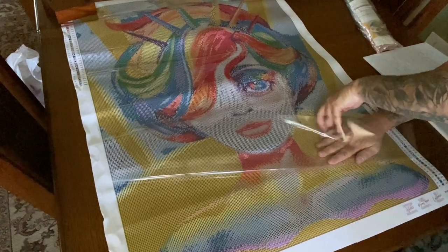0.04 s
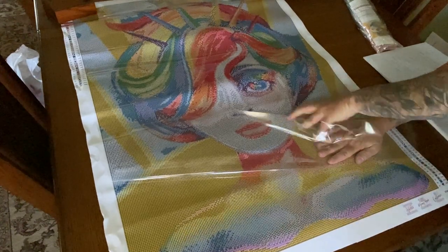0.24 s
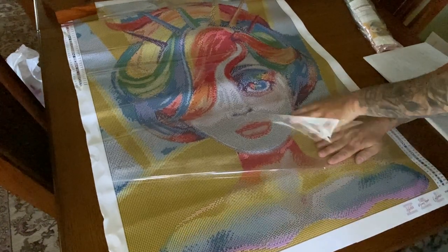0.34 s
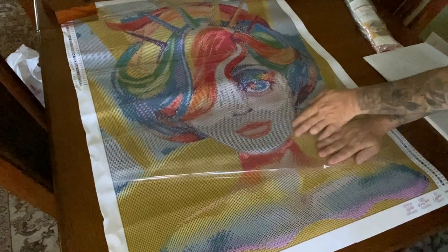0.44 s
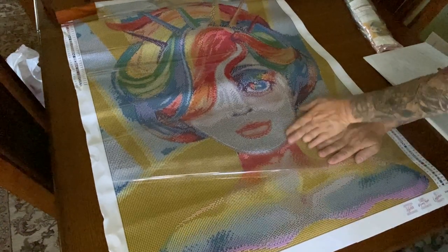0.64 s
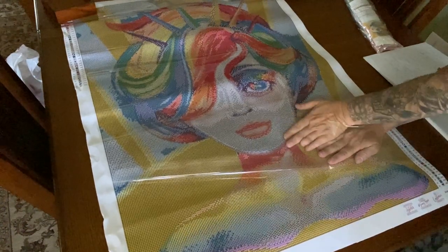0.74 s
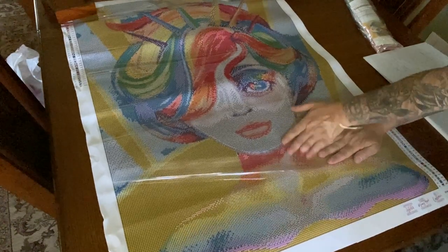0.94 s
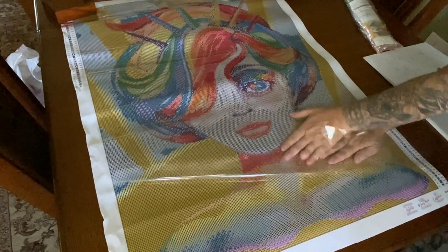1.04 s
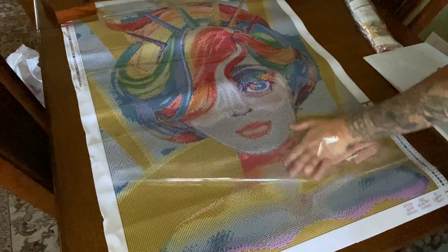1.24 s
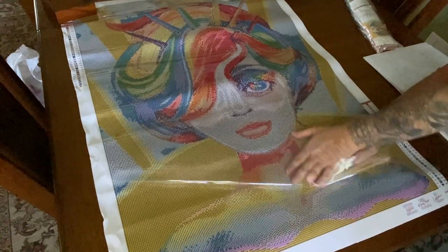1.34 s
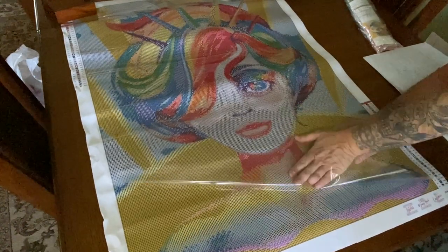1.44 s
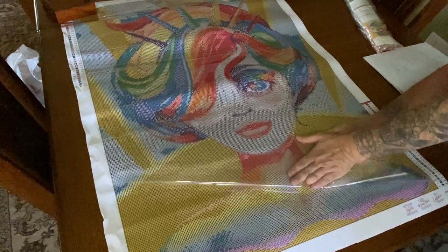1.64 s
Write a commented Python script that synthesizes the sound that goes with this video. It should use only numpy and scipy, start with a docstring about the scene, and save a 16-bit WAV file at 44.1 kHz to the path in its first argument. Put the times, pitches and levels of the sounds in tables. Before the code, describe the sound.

A thick plastic sheet crinkles with sharp, irregular snaps as hands lay it down and smooth it on a table. The crackle swells twice, with dull palm rubbing underneath, heard close by in a small room.

```python
"""In a small room, hands lay a thick plastic sheet on a table and smooth it flat, close by.
Creases buckle with sharp snaps that shiver through the sheet. Tiny wrinkles crackle under the hands,
and the sliding plastic hisses. The palms rub and bump the table, and leaning arms make it rumble.
The snaps and the crackle echo briefly in the room, over a faint hush."""
import sys
import numpy as np
from scipy import signal
from scipy.fft import rfft, irfft, next_fast_len
from scipy.io import wavfile
from scipy.ndimage import uniform_filter1d

SR = 44100
rng = np.random.default_rng(int(sys.argv[2]) if len(sys.argv) > 2 else 0)


def int16_out(signal):
    """Quantize to a 16-bit WAV file."""
    q = np.round(np.clip(np.atleast_2d(signal).T, -1, 1) * 32767)
    wavfile.write(sys.argv[1], SR, q.astype(np.int16))


N = 74970

# Each crease snap; a facet is the patch of plastic that buckles. All levels are relative.
# start_s, decay_steps (of DECAY_STEP_S), pitch_hz, body_db, treble_db, top_db, thud_db
CREASE_SNAPS = [(0.0763, 1.1, 1540, -16.5, -13, -5, -12.5), (0.0943, 1.8, 1100, -26, -20.5, -14, -19.5),
                (0.1549, 1.6, 1040, -19, -12.5, -9, -11.5), (0.2208, 0.6, 1480, -21, -29, -33, -42),
                (0.239, 2, 1410, -11.5, -10, -26, -16), (0.2445, 1.9, 1080, -11, -0.5, -7, -8.5),
                (0.247, 1.6, 1210, -3.5, 3.5, -9, -1.5), (0.2888, 0.97, 1290, -13, -10, -24, -12),
                (0.3097, 0.67, 1350, 7.5, 12.5, -2, -2.5), (0.3922, 0.29, 1550, 2.5, 5, 2.5, -2),
                (0.4934, 0.68, 1600, -7.5, -7, -22, -36), (0.5163, 1, 1070, -20, -10, -30, -48),
                (0.5865, 0.25, 1364, 5, 4.5, -6.5, -14), (0.6840, 0.4, 1520, -11.5, -2, -15, -23),
                (0.7227, 0.8, 1520, 4.5, 4, 2.5, -7.5), (0.9313, 0.4, 1280, -1.5, 0.5, -7.5, -42),
                (0.9968, 7, 1380, -7.5, -16.5, -32, -15), (1.0247, 0.3, 1350, 2.5, 6, 2, -13),
                (1.0252, 1.8, 1240, 5.5, -4.5, -3, -31), (1.0418, 3.6, 1000, -4, 4, -19, -8.5),
                (1.0862, 4.7, 1160, -6, -19, -38, -11), (1.1971, 0.78, 934, 8.5, 10.5, 7, -3.5),
                (1.2168, 3.7, 930, -0.5, 2, -18, -11.5), (1.2695, 0.19, 1110, -3, -4.5, -10, -1.5),
                (1.281, 0.58, 1310, 0.5, 2, 0.5, -15), (1.2862, 0.14, 1340, -2, 3, -22, -9),
                (1.3152, 1.2, 1260, -4.5, 4.5, -13, 2), (1.321, 1.7, 1370, 3, 11.5, 0, -1),
                (1.3383, 0.5, 1420, -3, -5, -0.5, -12), (1.3854, 0.19, 940, -1, 0, -7.5, 1.5),
                (1.5211, 3.7, 1320, -7.5, -15, -27, -7.5), (1.5722, 0.57, 1050, -3.5, -14.5, -25.5, -32),
                (1.6823, 1.05, 1260, -13.5, -30.5, -75, -17)]
# Where a snap's body, treble and top lie: pitch_hz
SNAP_BANDS = [2200, 5500, 12000]
# Peaks (+) and hollows (-) in the tone of the widest facets: start_s, pitch_hz, level_db
FACET_RESONANCES = [(0.3095, 1700, 1.5), (0.3095, 2200, -2), (0.3095, 3280, 4.5), (0.3095, 4750, -6.5),
                    (0.3918, 2600, 6), (0.5865, 2770, -6.5), (0.5865, 4240, -6.5), (0.7223, 1640, 3),
                    (0.7223, 2080, 5), (0.9309, 4720, -14), (1.1969, 780, 4.5), (1.1969, 1100, -3.5),
                    (1.1969, 1420, 5.5), (1.1969, 4650, -9.5), (1.3213, 2680, 8)]
# Tone of the sheet, its shiver, and the table's thud under a snap: pitch_hz, level_db
SHEET_TONE = [(1000, -1), (1450, 3.5), (2050, 4), (2700, 0), (3500, 2), (4800, -1), (6500, 0.5), (8200, 6),
              (10000, 4), (12500, 1), (14500, -4), (15700, -16), (17000, -30)]
SHIVER_TONE = [(300, 4.5), (1500, -3), (4000, -2), (8000, -4), (14000, -74)]
THUD_TONE = [(30, -62), (150, -14.5), (300, -8.5), (500, -5), (750, -5.5), (1100, -2), (2000, -57),
             (6000, -78)]
# How long the sheet and the room take to fade by 60 dB: pitch_hz, fade_s
SHIVER_FADE = [(300, 0.15), (1500, 0.064), (4000, 0.066), (12000, 0.0037)]
ROOM_FADE = [(200, 0.2), (700, 0.16), (2000, 0.4), (6000, 0.35), (13000, 0.12)]
# Tone given to the echo and crackle, with a treble dip applied near 9.7 kHz: pitch_hz, level_db
ECHO_TONE = [(150, 6), (500, 1), (1000, -3), (2000, -7), (4000, -7), (8300, -9.5), (9700, -18),
             (12500, -2.5), (15500, -58)]
CRACKLE_TONE = [(100, -33), (600, -9.5), (1400, 5), (3500, 2), (8000, 2), (9700, -7.5), (13000, -7.5),
                (16000, -50)]
# Stereo width given to the echo and shiver, with the top treble narrowed toward the centre:
# pitch_hz, centring (0 is wide, 1 is centred)
STEREO_CENTRING = [(200, 0.65), (1200, 0.64), (2500, 0.34), (6000, 0.057), (10000, 0.76)]
# Loudness of the wrinkles, sliding plastic, palms and leaning arms: time_s, level_db
CRACKLE_LOUDNESS = [(0, -79), (.08, -54.5), (.22, -58.5), (.25, -46), (.30, -37), (.32, -29), (.34, -44.5),
                    (.5, -52), (.66, -44.5), (.76, -57.5), (.88, -60), (.98, -47), (1.07, -58),
                    (1.16, -53.5), (1.27, -43), (1.305, -27.5), (1.36, -50), (1.45, -52.5), (1.7, -81)]
SWISH_LOUDNESS = [(.06, -80), (.085, -55), (.18, -59), (.25, -69), (.4, -66.5), (1.17, -86), (1.2, -62),
                  (1.33, -53), (1.41, -93.5)]
RUB_LOUDNESS = [(0, -98), (.08, -81), (.21, -60), (.255, -60.5), (.33, -42.5), (.42, -50), (.62, -64.5),
                (.85, -77), (1.03, -56.5), (1.17, -61.5), (1.25, -48), (1.325, -32), (1.42, -41.5),
                (1.5, -53), (1.58, -49), (1.66, -64.5)]
RUMBLE_LOUDNESS = [(.02, -81), (.08, -65), (.3, -65), (.72, -71.5), (.87, -84), (.95, -65), (1.4, -72.5),
                   (1.6, -96)]
# Tone given to the swish, rub, rumble and hush: pitch_hz, level_db
SWISH_TONE = [(6000, -26), (11000, 21), (14000, 3), (16000, 0)]
RUB_TONE = [(25, -28), (65, -11), (120, -19), (190, -22), (290, 4.5), (420, -1), (650, 5), (1300, 6),
            (3000, 1.5), (9000, -32)]
RUMBLE_TONE = [(25, -20), (60, -7.5), (115, 2), (300, -23)]
HUSH_TONE = [(25, -20), (120, -10), (600, -23), (5000, -16.5), (15000, -41)]
# Soft bumps that set the table humming: start_s, pitch_hz, level_db
TABLE_BUMPS = [(0.152, 252.6, -50.5), (0.244, 281.3, -47)]
# How much louder the left side is than the right: pitch_hz, difference_db
BALANCE = [(100, -1.5), (500, -2.5), (1100, -3), (2200, -1), (4500, -0.5), (8000, -2), (12000, 1.5)]

SNAP_GAIN_DB, SNAP_RISE_S, DECAY_STEP_S = -0.5, 0.000086, 0.0014
FACET_Q, RESONANCE_OCTAVES = 1.394, 0.16  # a higher Q rings longer
BEND_S = 0.0003  # sets how far low pitches trail high ones in the sheet
LEAD_S = 0.002  # silence that leaves room for a snap's rise
WRINKLES_PER_S, WRINKLE_SPREAD_DB = 2400, 2.5
BUMP_RISE_S, BUMP_FADE_S = 0.0022, 0.3
SNAP_WIDTH, LEFT_LAG_S, LAG_SPREAD_S = 0.32, 5.3e-5, 0.6e-5
ROOM_DELAY_S, HUSH_DB, TOP_HZ = 0.003, -69, 16200


def creases():
    """Creases snap one by one; each sets the sheet shivering and echoes in the room."""
    out = np.zeros((2, N))
    for start_s, decay_steps, pitch_hz, *band_db, thud_db in CREASE_SNAPS:
        click = snap(start_s, decay_steps * DECAY_STEP_S, pitch_hz, band_db, thud_db)
        for part in (click, sheet_shiver(click), room_echo(click)):
            mix_in(out, part, start_s - LEAD_S)
    return out


def snap(start_s, decay_s, pitch_hz, band_db, thud_db, size=2048):
    """A crease buckles: a short burst rings its facet for a few cycles, and the table thuds below."""
    t, hz = np.arange(size) / SR, np.fft.rfftfreq(size, 1 / SR)
    burst = rfft(rng.standard_normal((2, size)) * (1 - np.exp(-t / SNAP_RISE_S)) * np.exp(-t / decay_s))
    lag_s = LEFT_LAG_S + LAG_SPREAD_S * rng.standard_normal()
    pair = left_right(burst[0], SNAP_WIDTH * burst[1], hz, lag_s)
    power = np.abs(uniform_filter1d(np.abs(pair) ** 2, size=22, axis=1))
    pair /= np.sqrt(power + 1e-12)  # even out the burst's tone
    ratio = hz / pitch_hz
    facet = np.abs(ratio ** 2 / (1 - ratio ** 2 + 1j * ratio / FACET_Q))
    facet *= ratio ** 2 / np.hypot(0.5, ratio ** 2)  # take away more bass
    facet *= gain(at_pitch(np.c_[SNAP_BANDS, band_db], hz) + at_pitch(SHEET_TONE, hz))
    thud = gain(thud_db + at_pitch(THUD_TONE, hz))
    tone = np.hypot(facet, thud) * gain(facet_resonances(start_s, hz))
    # Bending waves carry high pitches faster than low ones.
    bend = np.exp(-4j * np.pi * BEND_S * np.sqrt(1e3 * hz)) * np.exp(1j * np.pi * hz * BEND_S / 2)
    lead = np.exp(-2j * np.pi * hz * LEAD_S)
    return irfft(pair * ring_after_hit(tone) * bend * lead)[:, :size // 2] * gain(SNAP_GAIN_DB)


def facet_resonances(start_s, hz):
    """A wide facet rings in its own way: its peaks and hollows, in dB."""
    return sum(db * np.exp(-(np.log2((hz + 1) / pitch_hz) / RESONANCE_OCTAVES) ** 2)
               for when_s, pitch_hz, db in FACET_RESONANCES if abs(when_s - start_s) < 2 * LEAD_S)


def sheet_shiver(click):
    """The whole sheet rings briefly after a snap."""
    return signal.fftconvolve(click[1:], ring_out(SHIVER_FADE, SHIVER_TONE), axes=1)


def crackle():
    """Countless tiny wrinkles give way under the moving hands, and the room echoes them."""
    ticks = (rng.random(N) < WRINKLES_PER_S / SR) * rng.standard_normal((2, N))
    ticks *= gain(WRINKLE_SPREAD_DB * np.clip(rng.standard_normal(N), -2, 2))
    sound = stereo(ticks, CRACKLE_TONE, width=0.47) * loudness(CRACKLE_LOUDNESS)
    return sound + room_echo(sound)[:, :N]


def swish():
    """The plastic slides, and its many tiny points of contact hiss."""
    return noise(SWISH_TONE, width=1.0) * loudness(SWISH_LOUDNESS)


def palms():
    """The hands rub dully through the sheet, and their soft bumps make the table hum."""
    out = noise(RUB_TONE, width=0.63) * loudness(RUB_LOUDNESS)
    t = np.arange(SR // 2) / SR
    for start_s, pitch_hz, db in TABLE_BUMPS:
        envelope = gain(db - 60 * t / BUMP_FADE_S) * (1 - np.exp(-t / BUMP_RISE_S))
        hum = envelope * np.sin(2 * np.pi * pitch_hz * t)
        mix_in(out, hum[None], start_s)
    return out


def table_rumble():
    """The table rumbles under the weight of the arms."""
    return noise(RUMBLE_TONE, width=0.34) * loudness(RUMBLE_LOUDNESS)


def room_echo(sound):
    """The room sends a sound back a moment later; the right channel feeds the echo on both sides."""
    echo = np.pad(ring_out(ROOM_FADE, ECHO_TONE), ((0, 0), (int(ROOM_DELAY_S * SR), 0)))
    return signal.fftconvolve(sound[1:], echo, axes=1)


def room_hush():
    """A faint, steady noise fills the room."""
    return gain(HUSH_DB) * noise(HUSH_TONE, width=0.43)


def ring_out(fade_table, tone):
    """Half a second of stereo noise in which each pitch dies away at its own speed."""
    hz, t, spectra = signal.stft(rng.standard_normal((2, SR // 2)), SR, nperseg=128)
    hz = hz[:, None]
    fade_s = at_pitch(fade_table, hz)
    spectra *= gain(at_pitch(tone, hz) - 60 * t / fade_s)
    spectra *= np.sqrt(2 * np.log(1000) / (fade_s * SR))  # same energy for long and short fades
    angle = np.arccos(at_pitch(STEREO_CENTRING, hz)) / 2
    pair = left_right(spectra[0] * np.cos(angle), spectra[1] * np.sin(angle), hz, LEFT_LAG_S)
    return signal.istft(pair, SR, nperseg=128)[1][:, :SR // 2]


def ring_after_hit(tone):
    """A filter with this tone that rings only after a hit, never before (minimum phase)."""
    cepstrum = irfft(np.log(np.maximum(tone, 1e-6)))
    half = len(cepstrum) // 2
    cepstrum[1:half] *= 2
    cepstrum[half + 1:] = 0
    return np.exp(rfft(cepstrum))


def noise(tone, width):
    """Steady stereo noise with this tone."""
    return stereo(rng.standard_normal((2, N)), tone, width)


def stereo(pair, tone, width):
    """Blend two unrelated signals into one stereo sound with this tone and an average power of 1."""
    middle, side = rfft(pair)
    hz = np.fft.rfftfreq(N, 1 / SR)
    sound = irfft(left_right(middle, width * side, hz, LEFT_LAG_S) * gain(at_pitch(tone, hz)), N)
    return sound / np.sqrt(np.mean(sound ** 2) + 1e-20)


def left_right(middle, side, hz, lag_s):
    """Left and right spectra; the sound reaches the left a little later."""
    half_delay = np.exp(-1j * np.pi * hz * lag_s)
    return np.array([(middle + side) * half_delay, (middle - side) / half_delay])


def gain(db):
    """Turn decibels into a number to multiply by."""
    return 10 ** (np.asarray(db) / 20)


def at_pitch(table, hz):
    """Read between a table's rows, on a scale of octaves."""
    pitches, values = np.transpose(table)
    return np.interp(np.log(hz + 1), np.log(pitches), values)


def loudness(table):
    """Turn rows of time_s, level_db into a gain for every sample."""
    return gain(np.interp(np.arange(N) / SR, *np.transpose(table)))


def filtered(sound, gain_at):
    """Turn each pitch up or down by gain_at(hz)."""
    size = next_fast_len(N + SR // 2)
    return irfft(rfft(sound, size) * gain_at(np.fft.rfftfreq(size, 1 / SR)), size)[..., :N]


def mix_in(out, sound, start_s):
    """Add a sound to the mix at its start time."""
    first = max(round(start_s * SR), 0)
    out[:, first:first + sound.shape[1]] += sound[:, :N - first]


def scene():
    """Sheet, hands and table, a little to the right, over the room's hush."""
    hush = room_hush()
    sound = creases() + crackle() + swish() + palms() + table_rumble() + hush
    return filtered(sound, lambda hz: gain(np.outer([0.5, -0.5], at_pitch(BALANCE, hz))))


def record(dry):
    """Cut away the very highest treble, above TOP_HZ."""
    return filtered(dry, lambda hz: 1 / np.sqrt(1 + (hz / TOP_HZ) ** 120))


dry = scene()
out = record(dry)
int16_out(out)
```